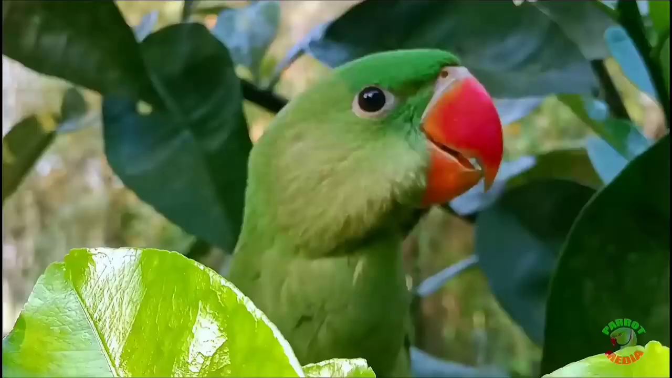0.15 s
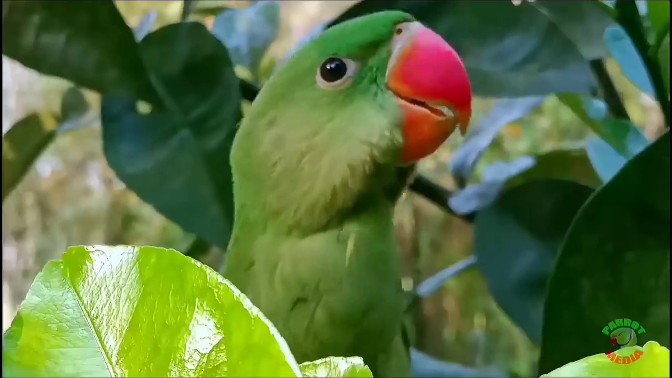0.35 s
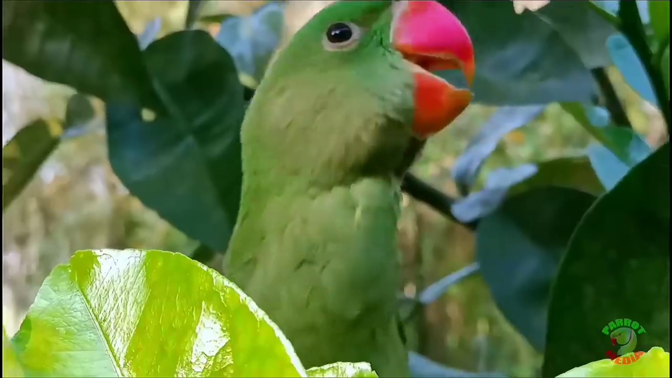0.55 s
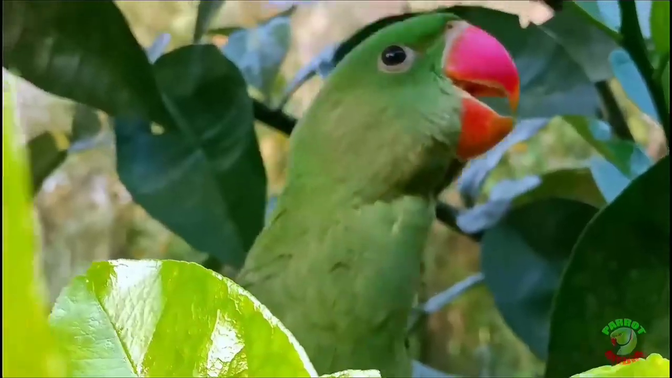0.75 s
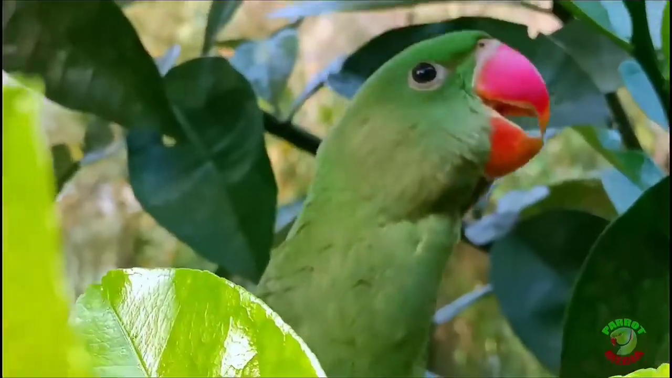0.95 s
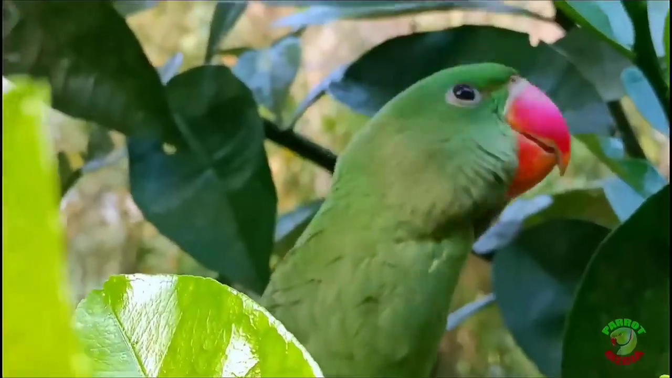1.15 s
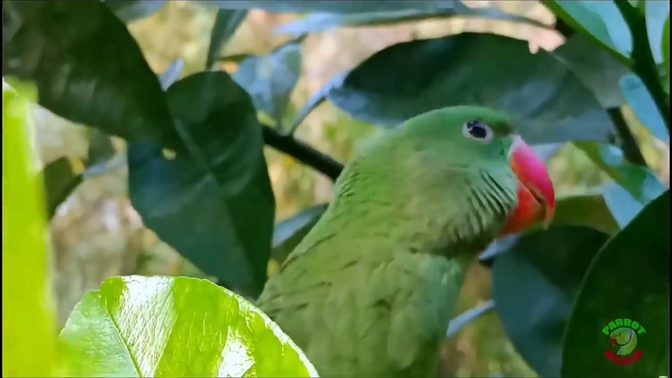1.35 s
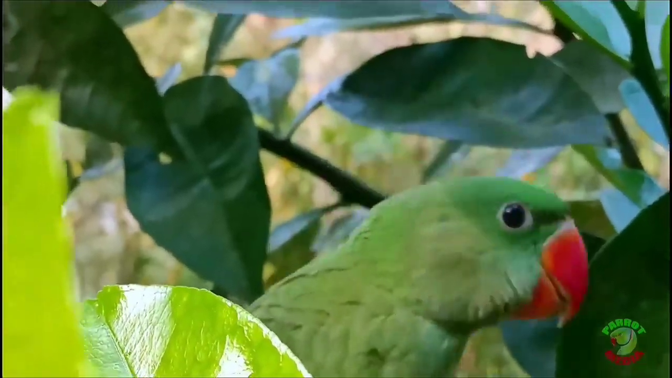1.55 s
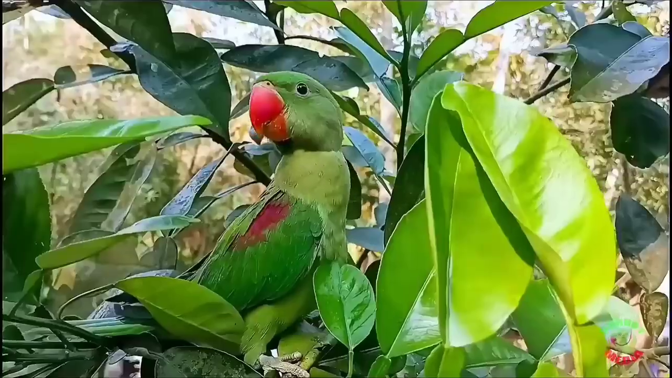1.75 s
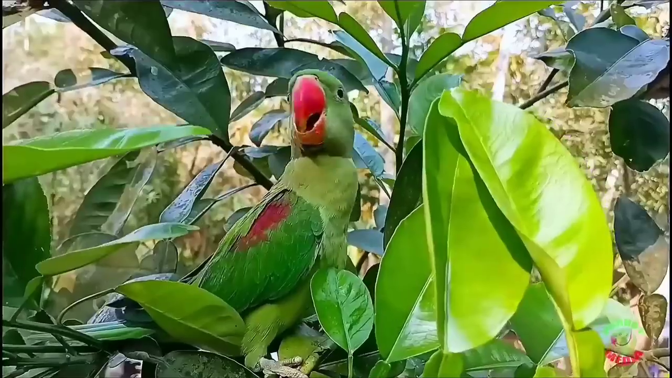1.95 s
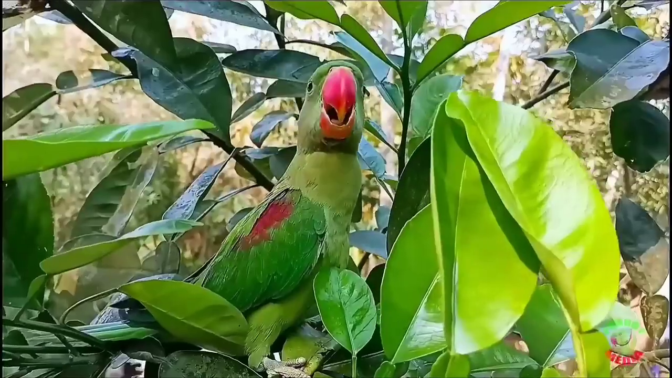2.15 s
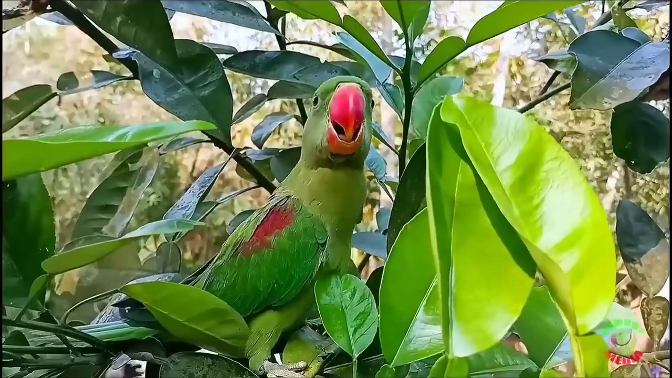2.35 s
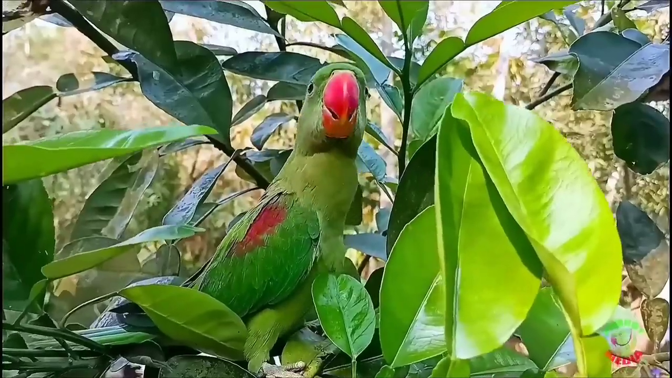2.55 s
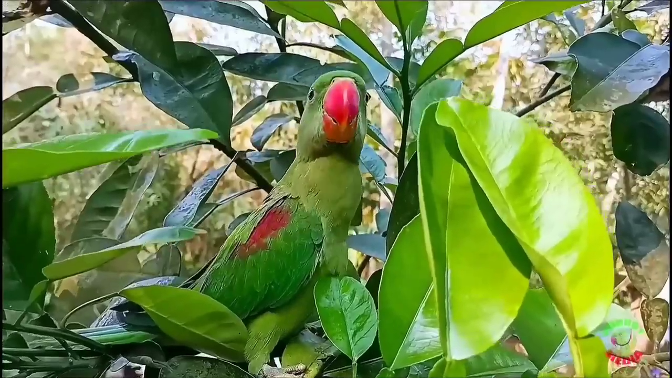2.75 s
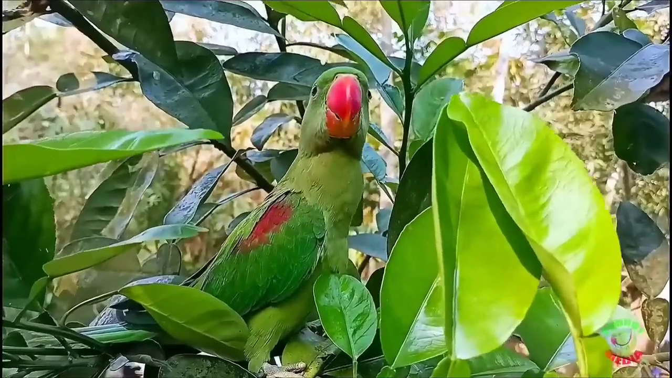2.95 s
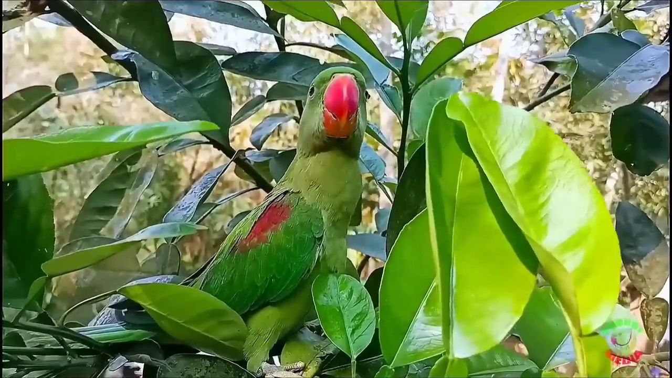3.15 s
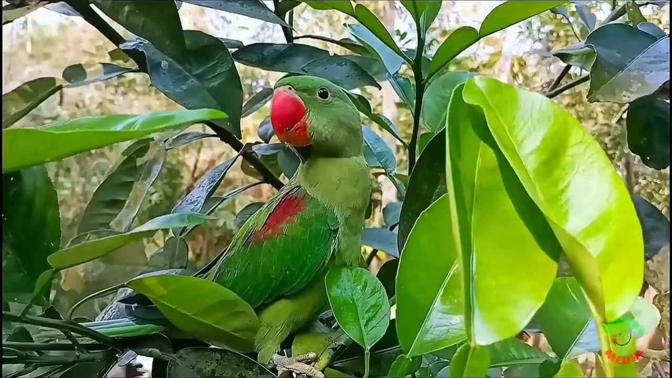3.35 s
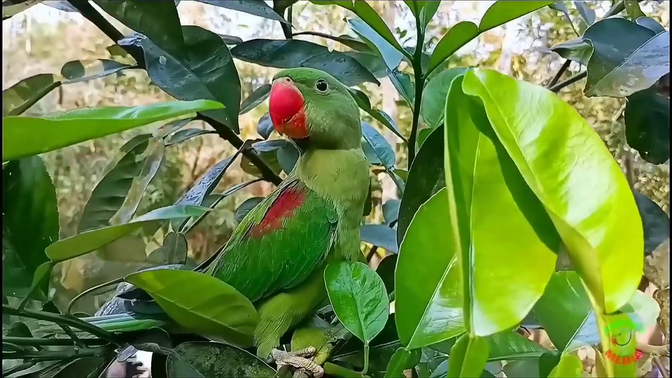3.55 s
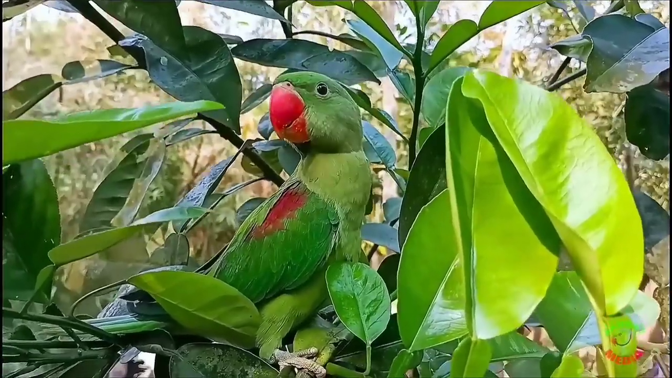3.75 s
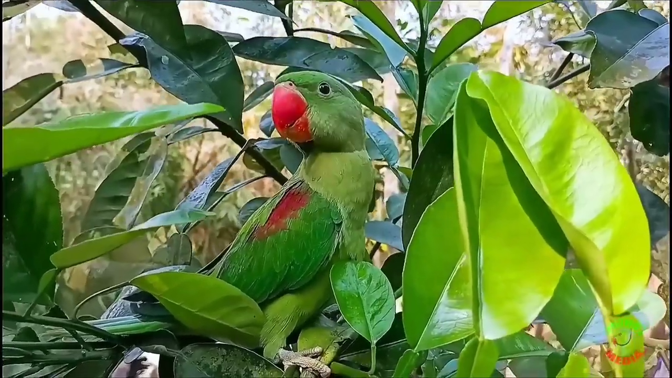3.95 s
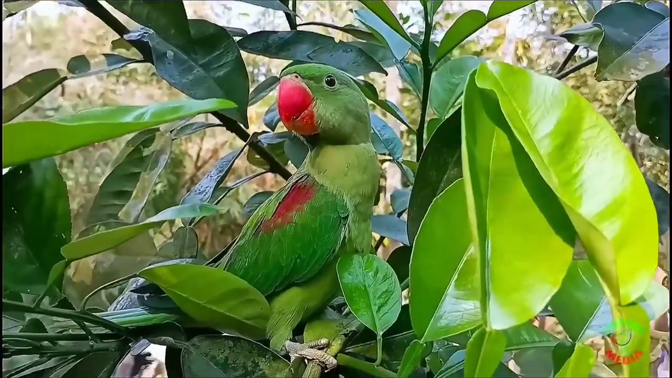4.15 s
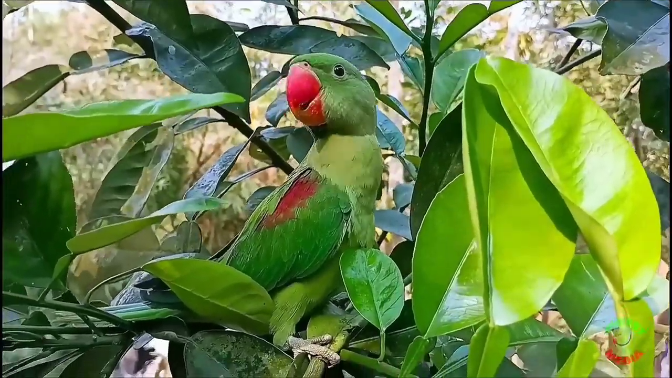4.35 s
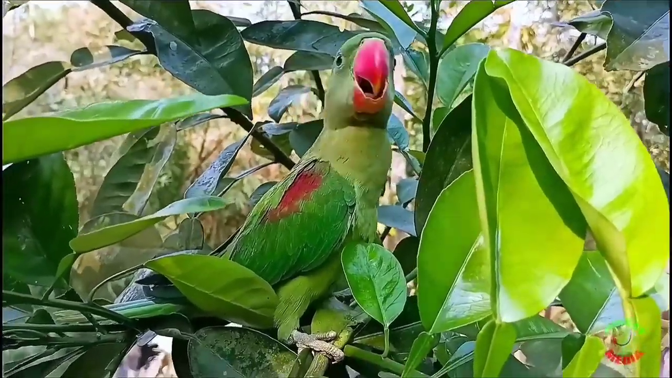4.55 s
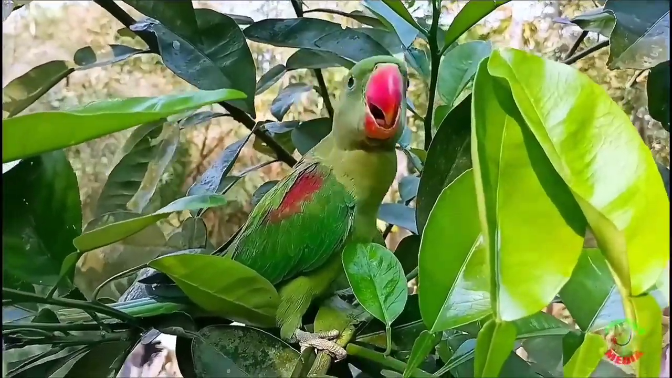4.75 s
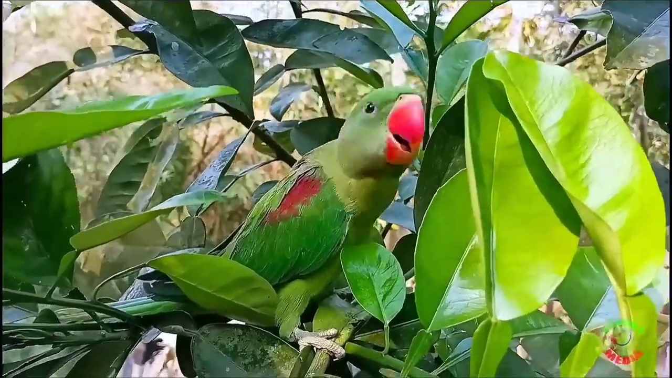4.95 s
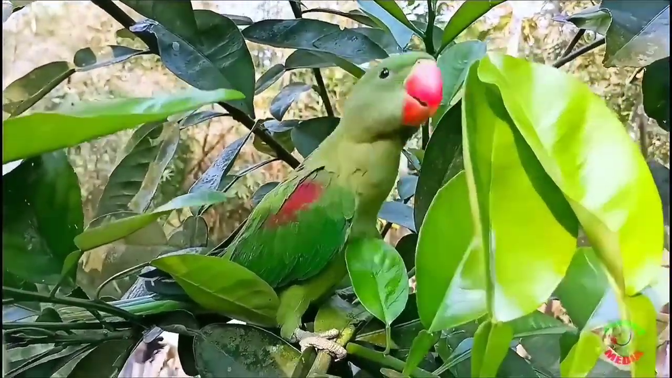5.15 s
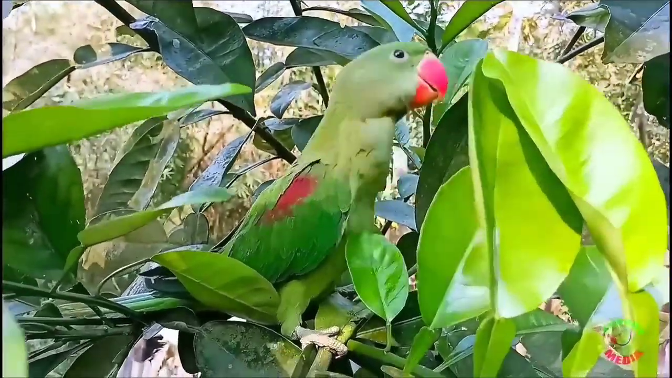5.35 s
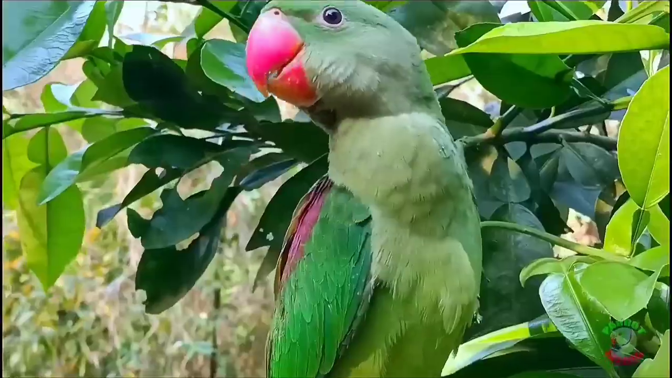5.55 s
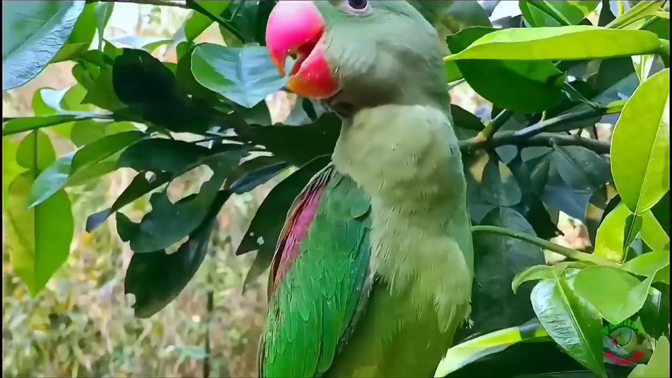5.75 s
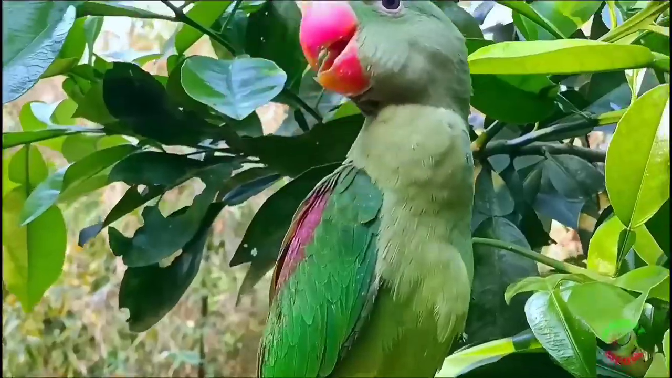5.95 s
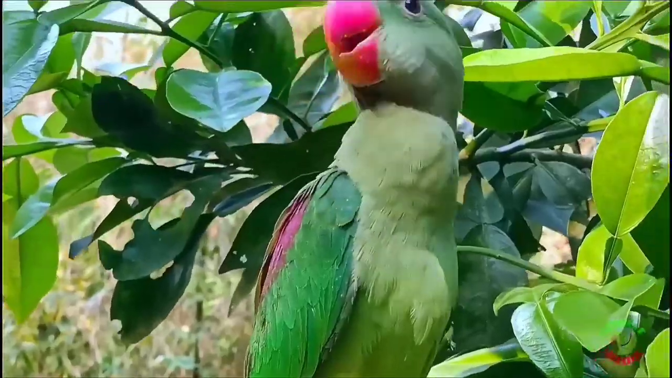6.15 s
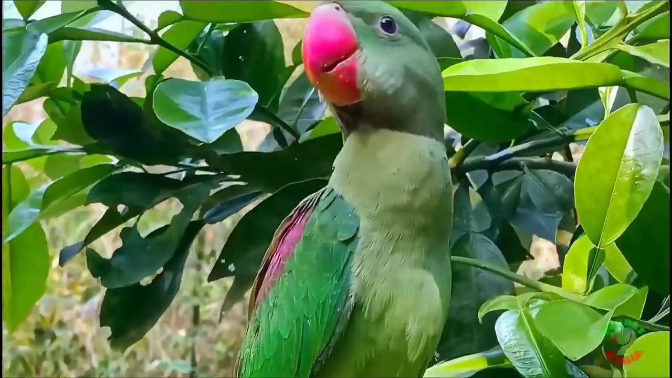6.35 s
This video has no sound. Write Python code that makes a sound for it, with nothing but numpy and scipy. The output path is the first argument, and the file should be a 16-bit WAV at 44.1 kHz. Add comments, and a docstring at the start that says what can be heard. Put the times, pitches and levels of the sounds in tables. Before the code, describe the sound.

Outdoors among leaves, faint distant birds chirp over soft air. A parakeet close to a stereo microphone then screeches loudly four times, each call leaping up and sliding down with a fast rattling warble and noisy rasp. Between the second and third come two short quiet yelps, clean at first then rough. The garden gives a short, light echo.

```python
"""In a leafy tree a parakeet gives four loud, harsh screeches close to a stereo microphone.
Each is a stack of harmonics that slides down, warbling some 25 times a second, under a noisy rasp.
Two short yelps between them start as clean tones and break up rough.
Far birds chirp as gliding tones and one mutters a caw; a thin whistle and a low throb pulse faintly.
Filtered noise makes the air and hiss; sparse decaying reflections make the garden's short echo."""
import sys
import numpy as np
from scipy import signal
from scipy.fft import rfft, irfft, next_fast_len
from scipy.io import wavfile

SR = 44100
rng = np.random.default_rng(int(sys.argv[2]) if len(sys.argv) > 2 else 0)


def wav_record(signal):
    """Record a signal, one row per channel, as 16-bit PCM in the file named by sys.argv[1]."""
    frames = np.transpose(np.atleast_2d(signal))
    bounded = np.clip(frames, -1, 1)
    # unit amplitude maps onto the largest positive 16-bit level
    quanta = np.round(bounded * 32767).astype(np.int16)
    wavfile.write(sys.argv[1], SR, quanta)


N = 282240
TIME_S = np.arange(N) / SR

# All source levels are those before the mix in scene().
# Screeches. Each row: start in seconds, length in seconds, time to full voice in seconds,
# voice level in dB, rasp level in dB, opening puff level in dB.
SCREECHES = [(.776, .56, 0.037, -12.5, -30.5, -36), (2.146, 0.65, 0.049, -10.5, -27, -41.5),
             (4.701, .591, .05, -10, -27.5, -38.5), (5.916, 0.6, 0.048, -9.5, -30, -44.5)]
# Pitch of each screech. Each row: opening note in Hz, top in Hz, end of the slide in Hz.
PITCHES = [(1340, 1675, 1010), (1480, 1696, 1018), (1490, 1713, 1045), (1460, 1706, 974)]
# Warble of each screech. Each row: delay of the first crest in seconds, depth in Hz,
# rate at the start, at EARLY_SHARE of the length and at the end in warbles per second.
WARBLES = [(.036, 156, 28.63, 25.58, 22.21), (.054, 165, 25.43, 27.77, 19.44),
           (.052, 159, 25.29, 30.62, 22.41), (.051, 170, 25.78, 25.34, 21.49)]
# Resonances that swell and fade as beak and tongue move. Each row: centre in Hz, half width in Hz.
BEAK_RESONANCES = [(3350, 396), (4700, 1900), (6700, 1700)]
# Lift of those resonances. One block per screech, one row per stage (head, middle, tail).
# Each row: lift in dB of the first, second and third resonance.
BEAK_LIFTS = [
    [(11, 3, 4.5), (6, 5, -1.5), (-3, 3.4, -0.5)],
    [(-10.5, 4, 9.7), (-5, 4, 9.5), (-2.5, 2.5, 1)],
    [(-3, 5.5, 10.3), (-4, 2, 6.8), (-3, 3, 1)],
    [(1, -2, 9), (-0.5, -2, 5.5), (10.5, -13, -1.5)],
]
# Resonances that come up as the beak closes. Each row: centre in Hz, half width in Hz, lift in dB.
CLOSING_RESONANCES = [(2802, 250, 13.5), (5280, 120, 10)]
# Steady colour of the voice. Each row: frequency in Hz, gain in dB.
THROAT = [(1000, -22), (1250, -18), (1450, -15), (1850, -7.5), (2200, -6), (2450, -7), (2900, -17),
          (3400, -7.5), (4000, -12.5), (4500, -10.5), (5600, -32), (6700, -16.5), (8000, -33.5),
          (9500, -37.5), (13000, -42)]
# The head points another way for each screech.
# Each row: frequency in Hz, left minus right in dB for screeches 1, 2, 3 and 4.
SIDES = [(1000, -1.5, 1.5, 1, 6), (1340, 4.5, 4, 4.5, 1.5), (1950, -3, -1, 2.5, 5.5),
         (2690, 2, -11, -6.5, -12.5), (3700, 2.5, 9, 9.5, -8), (4320, 12, 0.5, 4, -6.5),
         (5200, 6, -0.5, -1.5, 2), (6640, -14.5, -24, -33, -37), (7600, -0.5, -14, -17.5, -3.5),
         (12000, 15.5, 2.5, -12, 7)]
# Phase between the microphone ports. Each row: frequency in Hz, lead of the left port in radians.
PORT_LEAD = [(1000, -0.64), (1450, -1.48), (1850, -3), (2200, -2.5), (2600, -2), (3200, -1.23), (3900, -3),
             (4500, -4), (5500, -5), (7000, -8), (15000, -19.5)]
# Colour of the rasp. Each row: frequency in Hz, relative gain in dB.
RASP_COLOUR = [(1500, -6), (2500, 0), (3300, 4), (4500, 7), (5700, 4), (6800, 9), (8000, 1), (9600, 4),
               (11200, -3), (13000, -5), (15000, -3)]
# Low rush of air under a screech. Each row: frequency in Hz, relative gain in dB.
RUSH_COLOUR = [(80, -20), (200, 0), (700, 3.5), (1000, -16.5), (1600, -42)]
# Yelps. Each row: start in seconds, length in seconds, pitch in Hz, level in dB,
# time until the note breaks in seconds.
YELPS = [(3.446, 0.094, 2257, -31.5, .056), (3.706, 0.065, 2147, -40, 0.04)]
# Colour of the yelps. Each row: frequency in Hz, relative gain in dB.
YELP_COLOUR = [(1400, -2), (1900, -10), (2250, 7), (3200, 4.5), (4300, 10), (5600, 1.5), (7000, -10),
               (9000, -4), (12000, -15), (15000, -32)]
# Beak clicks and leaf ticks. Each row: start in seconds, level in dB, centre in Hz, decay in seconds.
TICKS = [(1.779, -50.5, 5510, 0.0074), (3.06, -54.5, 5920, 0.047), (3.972, -42, 2220, 0.0072),
         (3.977, -51.5, 4000, 0.045)]
# Far birds. Each row: start in seconds, length in seconds, start pitch in Hz, end pitch in Hz, level in dB.
CHIRPS = [(0.0, 0.056, 3100, 2990, -54), (0.212, 0.19, 1806, 1833, -60), (0.239, 0.2, 2730, 3010, -55.5),
          (0.228, 0.17, 4870, 4580, -60), (0.331, 0.18, 4444, 3900, -40.5), (.46, 0.076, 4120, 3360, -44),
          (0.559, 0.19, 510, 579, -48), (0.644, 0.13, 3680, 3510, -57.5), (1.677, 0.079, 5034, 4050, -39.5),
          (1.728, 0.042, 4490, 3400, -39.5), (3.801, 0.09, 2400, 1850, -47.5),
          (4.525, 0.084, 4680, 3895, -50.5), (4.587, 0.11, 3130, 3310, -49.5)]
# Thin whistles. Each row: start in seconds, end in seconds, level in dB.
WHISTLES = [(2.82, 3.35, -54), (5.3, 5.69, -55)]
# Low throbs. Each row: start in seconds, end in seconds, level in dB.
THROBS = [(1.9, 5.4, -69), (5.8, 6.5, -67.5)]
# Colour of the outdoor air. Each row: frequency in Hz, relative gain in dB.
AIR_COLOUR = [(15, -56), (25, 2), (113, -3), (173, -5.5), (199, -10.5), (321, -10.5), (394, -11.5),
              (452, -7), (897, -18.5), (1500, -32), (1950, -47), (3300, -120)]
# Colour of the garden hiss. Each row: frequency in Hz, relative gain in dB.
HISS_COLOUR = [(590, -23.5), (1000, -18), (1360, -9.5), (1560, -1.5), (1880, -11.5), (2360, 2.5),
               (2970, -3.5), (5720, -3.5), (7440, -10), (13700, -10.5), (15500, -7)]
# Swells of the hiss. Each row: start in seconds, end in seconds, level in dB.
HISS_SWELLS = [(.22, .8, -68.5), (1.76, 2.15, -60.5), (3.04, 4.15, -62), (5.64, 5.82, -67)]

EARLY_SHARE, STAGE_SHARES = .3, (.15, .5, .85)  # shares of a screech's length
# a screech opens soft, dull and flat, leaps up, sinks evenly and drops as it stops
ONSET_S, LEAP_S, ATTACK_DB = .009, .022, -23.5
OPENING_DB, OPENING_DB_PER_HARMONIC = -1.5, -3.5
STOP_S, STOP_DROP_HZ, STOP_DB = .023, 97, -13.5
# the warble narrows to one share of its depth, then calms between two times before the end
NARROW_SHARE, CALM_SHARE, CALM_FROM_S, CALM_BY_S = .56, .07, .145, .069
JITTER_RAD, WARBLE_JITTER_RAD = .025, .025  # always; added at the deepest warble
CLOSING_S, PUSH_DB = .14, 1  # beak closing: time before the end, last push
PUFF_LEAD_S, PUFF_HZ, PUFF_DECAY_S = .02, 1850, .028
RASP_ATTACK_DB, RASP_SINK_DB, RASP_STOP_DB, RASP_RELEASE_S = -19, -11, -28, .022
RASP_GAIN_DB, RUSH_DB = 3.5, -17  # rush relative to the rasp
YELP_ATTACK_S, YELP_ATTACK_DB, YELP_SOFT_DB = .016, -28, -4
YELP_RELEASE_S, YELP_RELEASE_DB = .07, -20
YELP_DROP_SHARE, YELP_DROP_S, YELP_BREAK_S = .18, .014, .025
YELP_CLEAN, YELP_ROUGH = .065, .8  # roughness before and after the break, 0-1
CHIRP_WOBBLE_SHARE, CHIRP_FLUTTER_DB = .026, 2.5
BEAT_RATE_HZ = 15.6
AIR_DB, AIR_SWELL_DB, HISS_DB = -59.5, 1.2, -64.5
EDGE_HZ = 15850


def screech(length_s, attack_s, level_db, pitches, warble_row, lift_rows, sides, skew=.17, jitter_hz=330,
            shimmer_db=2.5, drift_hz=11, treble_db=-3, swell_db=3.0, swell_lag_rad=.16):
    """The syrinx sounds a stack of harmonics that the warble sweeps through the throat resonances."""
    t = np.arange(0, length_s, 1 / SR)
    warble, depth_hz = warbling(t, length_s, attack_s, *warble_row)
    opening = np.clip((attack_s - t) / LEAP_S, 0, 1)
    closed = np.interp(length_s - t, [CLOSING_S / 2, CLOSING_S], [1, 0])
    edges_db = np.interp(t, [0, ONSET_S, length_s - STOP_S, length_s], [ATTACK_DB, 0, 0, STOP_DB])
    effort_db = level_db + OPENING_DB * opening + edges_db
    lifts_db = [np.interp(t / length_s, STAGE_SHARES, column) for column in np.transpose(lift_rows)]
    # as the call sinks, its overtones swell at each dip of the warble
    sinking = np.interp(t / length_s, [.45, .75, 1], [0, 1, 0])
    overtone_db = -swell_db * np.cos(warble - swell_lag_rad) * sinking
    warble_shape = np.cos(warble) - skew * np.sin(2 * warble)  # quick rise, slower fall
    hz = glide(t, length_s, attack_s, *pitches) + depth_hz * warble_shape + drift_hz * waver(t, 200)
    # the deeper the warble, the less regular the cycles: upper harmonics smear, the lowest stays clean
    jitter_rad = JITTER_RAD + WARBLE_JITTER_RAD * depth_hz / depth_hz.max()
    phase = phase_of(hz) + jitter_rad * waver(t, jitter_hz)
    ears, out = np.array([[.5], [-.5]]), 0
    for k in range(1, 10):
        f = k * hz
        db = effort_db + read(THROAT, f) + overtone_db * (k > 1) + shimmer_db * waver(t, 100)
        db = db + treble_db * np.clip((f - 7000) / 1500, 0, 1)
        for lift_db, (centre_hz, width_hz) in zip(lifts_db, BEAK_RESONANCES):
            db = db + lift_db * bump(f, centre_hz, width_hz)
        for centre_hz, width_hz, lift_db in CLOSING_RESONANCES:
            db = db + closed * lift_db * bump(f, centre_hz, width_hz)
        db = db + PUSH_DB * closed + OPENING_DB_PER_HARMONIC * (k - 1) * opening
        pan = amp(ears * read(sides, f))
        pan = pan / np.sqrt(np.mean(pan ** 2, axis=0))
        out = out + amp(db) * pan * np.cos(k * phase + ears * read(PORT_LEAD, f))
    return np.sqrt(2) * out * fade(t, .001)


def glide(t, length_s, attack_s, opening_hz, top_hz, end_hz):
    """Pitch of a screech without its warble: flat opening, leap, long slide, last drop."""
    times_s = [attack_s - LEAP_S, attack_s, length_s - STOP_S, length_s]
    return np.interp(t, times_s, [opening_hz, top_hz, end_hz, end_hz - STOP_DROP_HZ])


def warbling(t, length_s, attack_s, crest_s, depth_hz, *rates_hz):
    """Phase and depth of the warble: it sets in with the leap, narrows and ends slower."""
    turn = phase_of(np.interp(t, [0, EARLY_SHARE * length_s, length_s], rates_hz))
    times_s = [attack_s - LEAP_S, attack_s, length_s - CALM_FROM_S, length_s - CALM_BY_S]
    share = np.interp(t, times_s, [0, 1, NARROW_SHARE, CALM_SHARE])
    return turn - np.interp(crest_s, t, turn), depth_hz * share


def rasp(length_s, attack_s, rasp_db, pitches, flutter_db=1.96, left_db=-4, edge=1.6, leak_db=-24):
    """Air rushes through the open beak in uneven gusts, mostly from the second harmonic upwards."""
    t = np.arange(0, length_s + RASP_RELEASE_S, 1 / SR)
    times_s = [attack_s - LEAP_S, attack_s, length_s - STOP_S, t[-1]]
    shape_db = np.interp(t, times_s, [RASP_ATTACK_DB, 0, RASP_SINK_DB, RASP_SINK_DB + RASP_STOP_DB])
    pitch_hz = glide(t, length_s, attack_s, *pitches)
    air = noise(len(t), RASP_COLOUR, .25) * amp([[left_db], [0]])
    # hollow between the second and third harmonics
    valley = above(air, 2.25 * pitch_hz) - above(air, 2.65 * pitch_hz)
    air = above(air, edge * pitch_hz) - valley + amp(leak_db) * air
    air = air + amp(RUSH_DB) * noise(len(t), RUSH_COLOUR, 1.0)
    db = rasp_db + shape_db + RASP_GAIN_DB + flutter_db * waver(t, 90)
    return air * amp(db) * fade(t, .0027)


def yelp(start_s, length_s, top_hz, level_db, break_s, jitter_rad=.69, jitter_hz=520, right_db=-4,
         shimmer_db=4):
    """A clean note swells in softly, then drops in pitch and breaks up rough by phase jitter."""
    t = np.arange(0, length_s + YELP_RELEASE_S, 1 / SR)
    drop = 1 / (1 + np.exp((break_s + YELP_BREAK_S / 2 - t) / YELP_DROP_S))
    hz = top_hz * (1 - YELP_DROP_SHARE * drop)
    rough = np.interp(t, [break_s, break_s + YELP_BREAK_S], [YELP_CLEAN, YELP_ROUGH])
    shape_db = np.interp(t, [0, YELP_ATTACK_S, break_s, length_s, t[-1]],
                         [YELP_ATTACK_DB, YELP_SOFT_DB, 0, 0, YELP_RELEASE_DB])
    phase = phase_of(hz) + jitter_rad * rough * waver(t, jitter_hz)
    voice = unit(sum(amp(read(YELP_COLOUR, k * hz)) * np.cos(k * phase) for k in range(1, 8)))
    gain = amp(level_db + shape_db + shimmer_db * rough * waver(t, 260))
    return start_s, voice * gain * fade(t, .0032) * amp([[0], [right_db]])


def tick(start_s, db, hz, decay_s, rise_s=.002):
    """A small dry burst of band-passed noise that dies away exponentially."""
    t = np.arange(SR // 4) / SR

    def band(f):
        return f * hz / (f ** 2 + hz ** 2) / (1 + (f / (4 * hz)) ** 2)

    burst = unit(colour(rng.standard_normal((2, len(t))), band))
    burst = burst + .5 * burst[::-1]  # each side leaks into the other
    return start_s, amp(db) * burst * np.exp(-t / decay_s) * fade(t, rise_s)


def chirp(start_s, length_s, start_hz, end_hz, db):
    """A far bird: one slightly unsteady gliding tone."""
    t, hz = play([(start_s, start_hz), (start_s + length_s, end_hz)])
    phase = phase_of(hz * (1 + CHIRP_WOBBLE_SHARE * waver(t, 110)))
    tone = unit(np.sin(phase) * amp(CHIRP_FLUTTER_DB * waver(t, 90)))
    return start_s, amp(db) * tone * fade(t, length_s / 3)


def mutter(db=-51):
    """A faint nasal caw that rises a little: harmonics 3 to 17 without the lowest two."""
    t, hz = play([(1.83, 315), (2.02, 350)])
    phase = phase_of(hz * (1 + .008 * waver(t, 120)))
    voice = unit(sum(np.cos(k * phase) / np.sqrt(k) for k in range(3, 18)))
    return t[0], amp(db) * voice * fade(t, .06)


def pulsing(whistle_hz=2272, throb_hz=485, throb_width_hz=45):
    """A thin whistle and a low throb, both swelling with one beat about 16 times a second."""
    beat = np.cos(2 * np.pi * BEAT_RATE_HZ * TIME_S + .5 * waver(TIME_S, 3.9))
    whistle = np.sin(2 * np.pi * whistle_hz * TIME_S + .5 * waver(TIME_S, 41)) * (1 + beat / 2)
    throb = np.sin(2 * np.pi * throb_hz * TIME_S + waver(TIME_S, throb_width_hz)) * (1 + beat) ** 2
    return unit(whistle) * spans(WHISTLES, edge_s=.01) + unit(throb) * spans(THROBS, edge_s=.34)


def outdoors():
    """Low rumble of the open air, gently wavering, under a hiss that swells now and then."""
    air = unit(noise(N, AIR_COLOUR, .75)) * amp(AIR_DB + AIR_SWELL_DB * waver(TIME_S, 8))
    hiss = unit(noise(N, HISS_COLOUR, .1)) * (amp(HISS_DB) + spans(HISS_SWELLS, edge_s=.034))
    return air + hiss


def echo(x, t60_s, treble_hz, delay_s):
    """Sparse reflections that die away; the leaves soak up the treble."""
    t = np.arange(SR) / SR
    signs = rng.choice([-1., 1.], (2, SR))
    present = rng.random((2, SR)) < 2500 / SR  # about 2500 reflections a second
    taps = signs * present * (t > delay_s) * amp(-60 * t / t60_s)
    taps = taps / np.linalg.norm(taps, axis=1, keepdims=True)
    taps = colour(taps, lambda f: 1 / (1 + (f / treble_hz) ** 4))
    return signal.fftconvolve(x, taps, axes=1)[:, :N]


def amp(db):
    """Decibels to gain."""
    return 10 ** (np.asarray(db) / 20)


def unit(x):
    """Scales to rms 1."""
    return x / np.sqrt(np.mean(x ** 2) + 1e-20)


def phase_of(hz):
    """Phase in radians of a moving frequency."""
    return 2 * np.pi * np.cumsum(hz) / SR


def bump(hz, centre_hz, width_hz):
    """Bell-shaped resonance, 1 at its centre."""
    return np.exp(-((hz - centre_hz) / width_hz) ** 2)


def read(points, hz):
    """Reads a spectrum on a log-frequency axis."""
    f, value = np.transpose(points)
    return np.interp(np.log(hz + 1), np.log(f + 1), value)


def play(rows):
    """Sample times and every column of a curve table."""
    s, *columns = np.transpose(rows)
    t = np.arange(s[0], s[-1], 1 / SR)
    return [t] + [np.interp(t, s, c) for c in columns]


def add(mix, start_s, sound):
    """Mixes a sound in at start_s."""
    part = mix[:, max(round(start_s * SR), 0):][:, :sound.shape[-1]]
    part += sound[..., :part.shape[-1]]


def colour(x, gain):
    """Filters by a gain given as a function of Hz."""
    size = next_fast_len(x.shape[-1])
    return irfft(rfft(x, size) * gain(np.fft.rfftfreq(size, 1 / SR)), size)[..., :x.shape[-1]]


def waver(t, top_hz):
    """Random wobble of rms 1, mostly slower than top_hz."""
    return unit(colour(rng.standard_normal(len(t)), lambda f: 1 / np.sqrt(1 + (f / top_hz) ** 12)))


def noise(size, spectrum, same):
    """Stereo noise with a given spectrum and left-right correlation."""
    left, other = rng.standard_normal((2, size))
    right = same * left + np.sqrt(1 - same ** 2) * other
    return colour(np.array([left, right]), lambda f: amp(read(spectrum, f)))


def above(x, hz):
    """Keeps only what lies above the moving edge hz."""
    turn = np.exp(1j * phase_of(hz))
    z = signal.hilbert(x) / turn  # shift the edge to 0 Hz, then drop negative frequencies
    return (turn * (signal.hilbert(z.real) + 1j * signal.hilbert(z.imag))).real / 2


def fade(t, edge_s):
    """Linear ramps at start and end."""
    return np.clip(np.minimum(t - t[0], t[-1] - t) / edge_s, 0, 1)


def spans(rows, edge_s):
    """Gain of sounds that fade in, hold and fade out."""
    return sum(amp(db) * np.clip(np.minimum(TIME_S - start_s, end_s - TIME_S) / edge_s, 0, 1)
               for start_s, end_s, db in rows)


def scene():
    """The near bird is almost dry; the yelps and far birds carry more of the garden's echo."""
    near, yelps, far = np.zeros((3, 2, N))
    sides = np.array(SIDES)
    for k, (start_s, length_s, attack_s, voice_db, rasp_db, puff_db) in enumerate(SCREECHES):
        add(near, *tick(start_s - PUFF_LEAD_S, puff_db, PUFF_HZ, PUFF_DECAY_S))  # beak opens
        voice = screech(length_s, attack_s, voice_db, PITCHES[k], WARBLES[k], BEAK_LIFTS[k], sides[:, [0, k + 1]])
        add(near, start_s, voice)
        add(near, start_s, rasp(length_s, attack_s, rasp_db, PITCHES[k]))
    for row in TICKS:
        add(near, *tick(*row))
    for row in YELPS:
        add(yelps, *yelp(*row))
    for row in CHIRPS:
        add(far, *chirp(*row))
    add(far, *mutter())
    far = far * amp([[2], [-3]])  # left, right
    to_leaves = amp(-10) * near + amp(9.5) * yelps + amp(-7.5) * far
    leaves = echo(to_leaves, t60_s=.091, treble_hz=10970, delay_s=.001)
    to_garden = amp(-29) * near + amp(-2) * yelps + amp(-6.5) * far
    garden = echo(to_garden, t60_s=.69, treble_hz=4950, delay_s=.004)
    direct = amp(-1.07) * near + yelps + amp(-14.0) * far
    return direct + leaves + garden + pulsing() + outdoors()


def record(dry):
    """Rounds off the highest peaks, then applies the recorder's band limit."""
    held = dry / (1 + (dry / .95) ** 20) ** .05
    lowpass = signal.firwin(511, EDGE_HZ, window=("kaiser", 9), fs=SR)
    return signal.oaconvolve(held, lowpass[None], "same")


dry = scene()
out = record(dry)
wav_record(out)
```